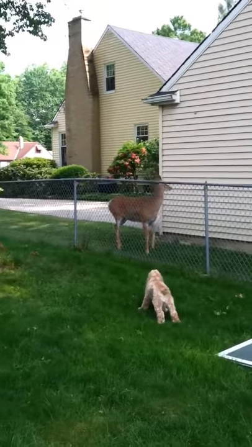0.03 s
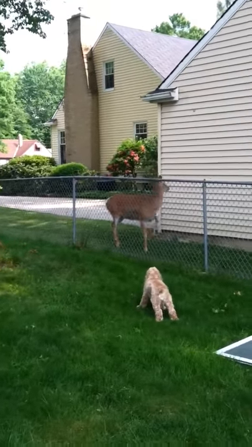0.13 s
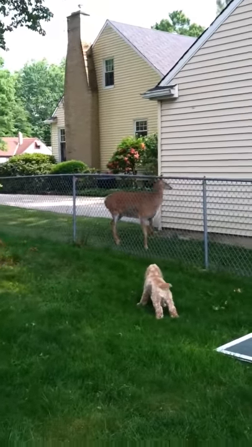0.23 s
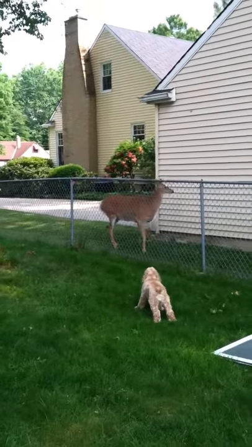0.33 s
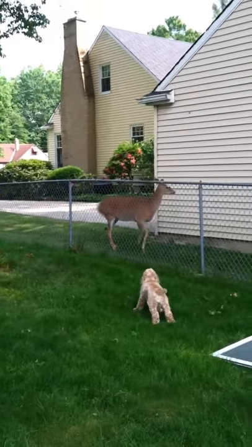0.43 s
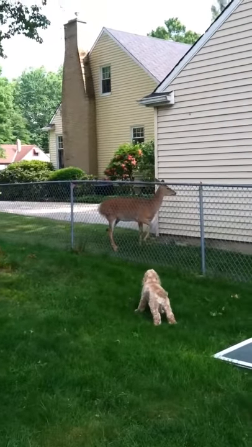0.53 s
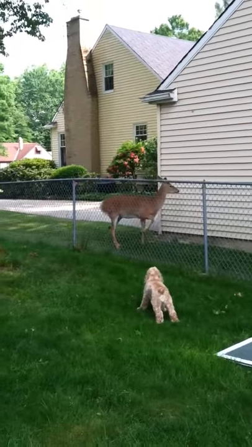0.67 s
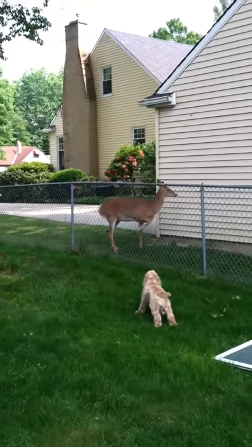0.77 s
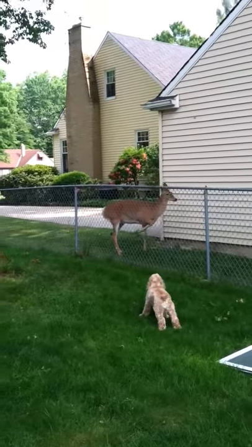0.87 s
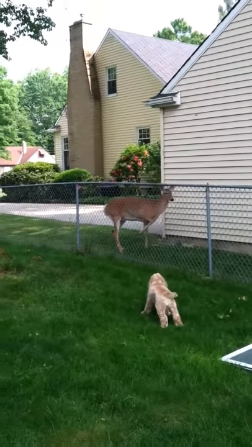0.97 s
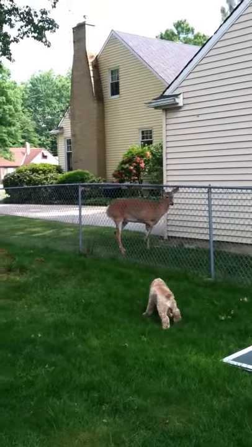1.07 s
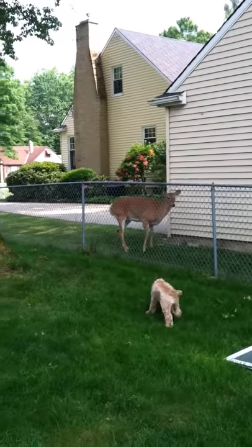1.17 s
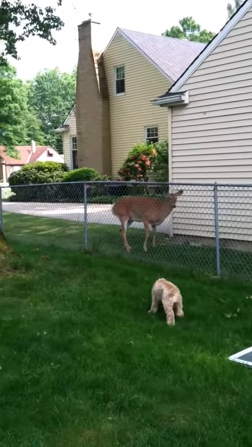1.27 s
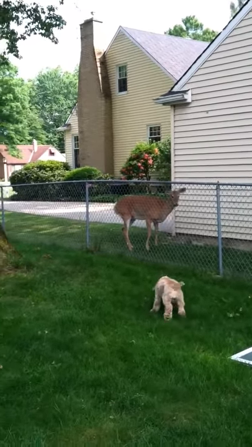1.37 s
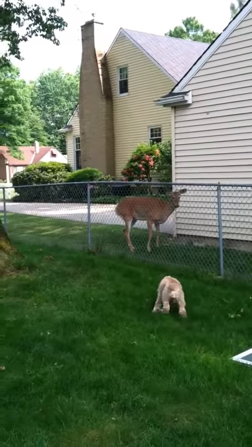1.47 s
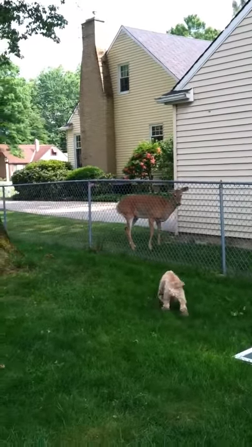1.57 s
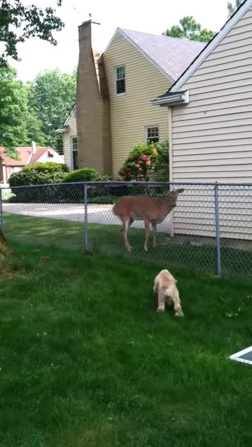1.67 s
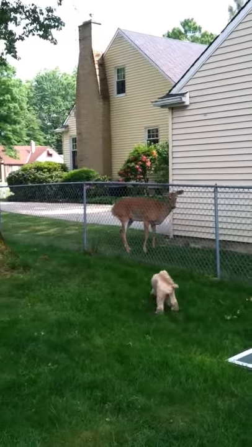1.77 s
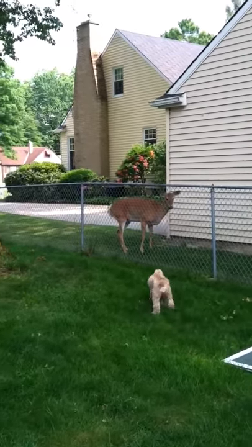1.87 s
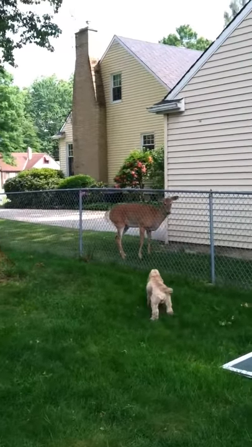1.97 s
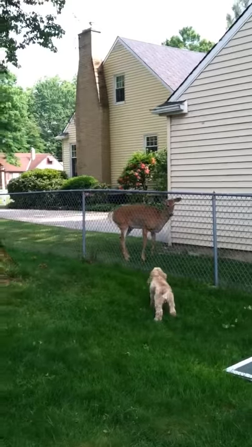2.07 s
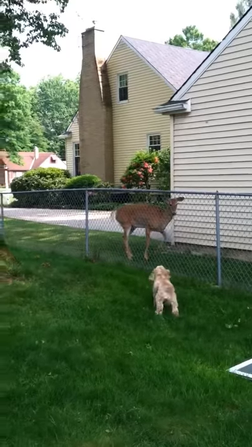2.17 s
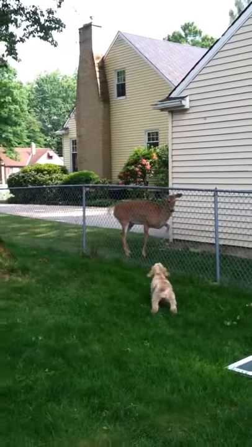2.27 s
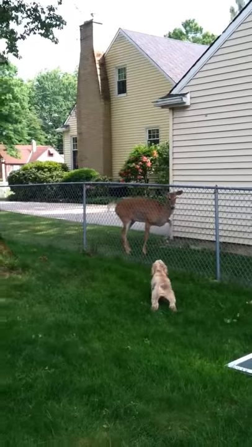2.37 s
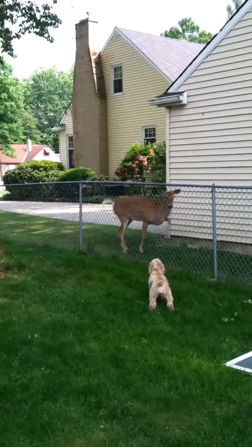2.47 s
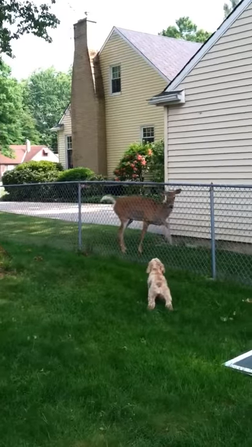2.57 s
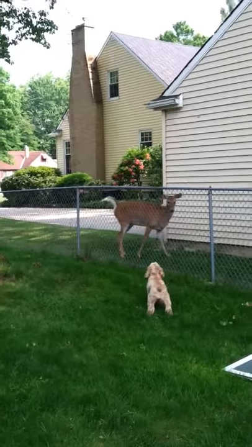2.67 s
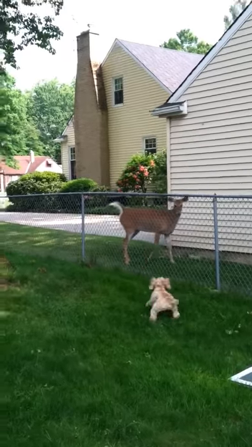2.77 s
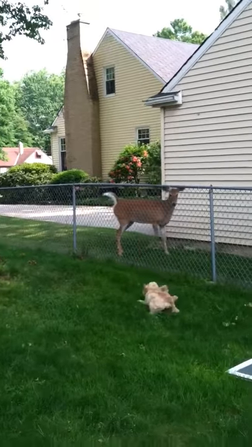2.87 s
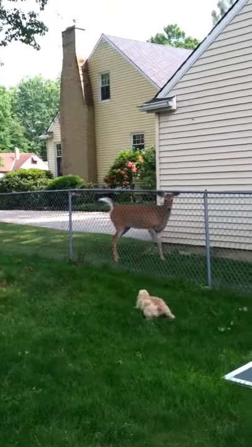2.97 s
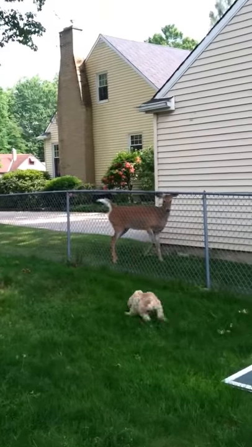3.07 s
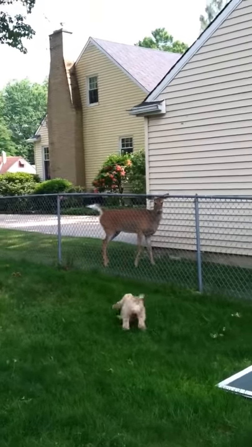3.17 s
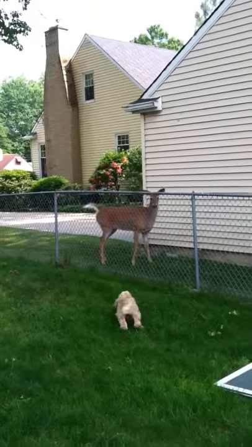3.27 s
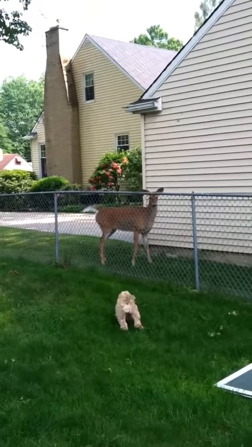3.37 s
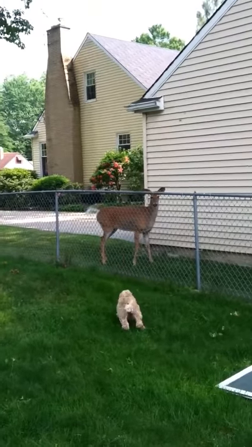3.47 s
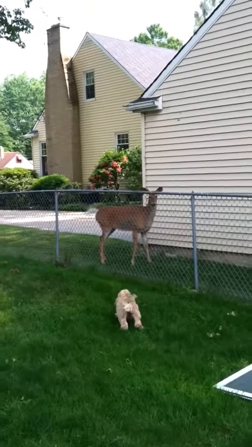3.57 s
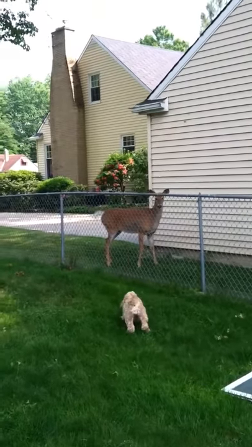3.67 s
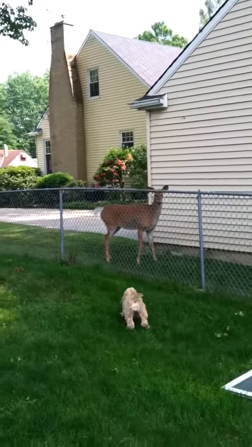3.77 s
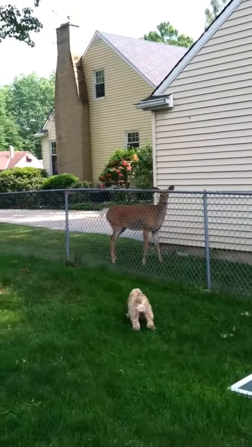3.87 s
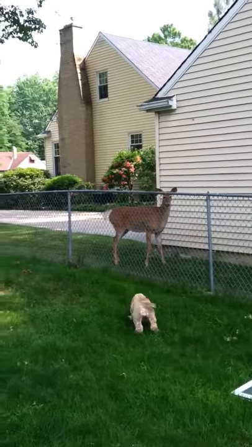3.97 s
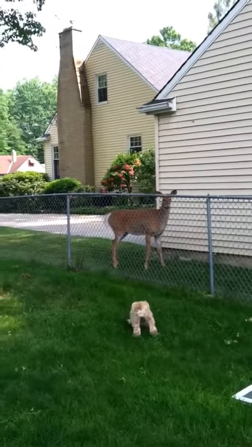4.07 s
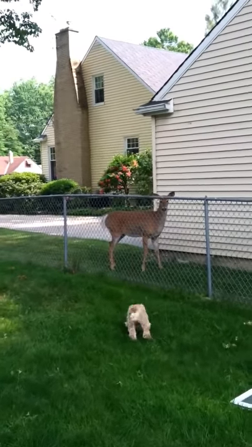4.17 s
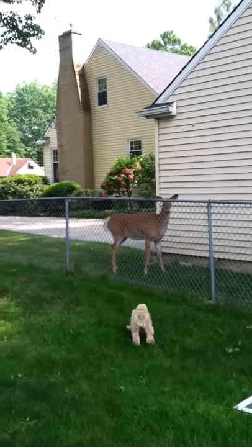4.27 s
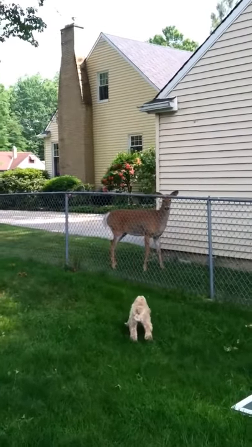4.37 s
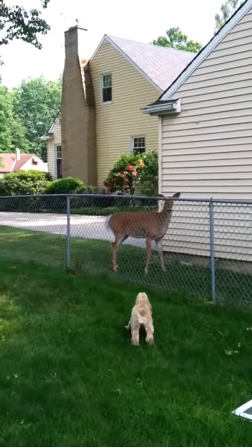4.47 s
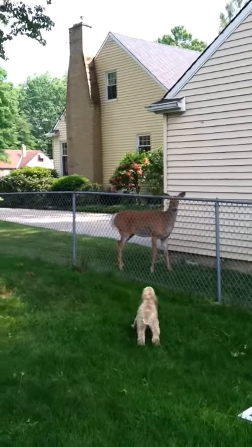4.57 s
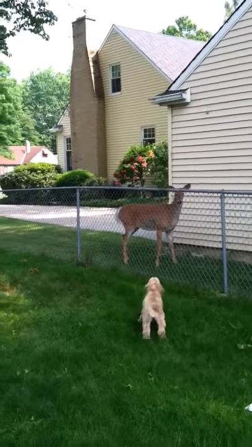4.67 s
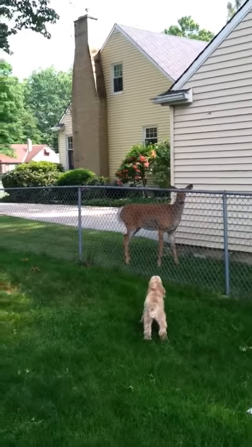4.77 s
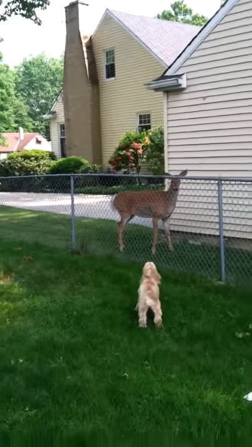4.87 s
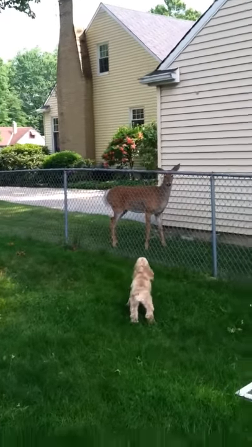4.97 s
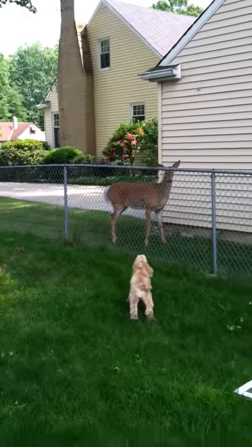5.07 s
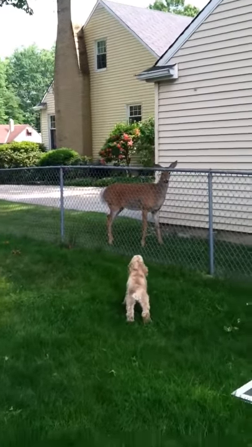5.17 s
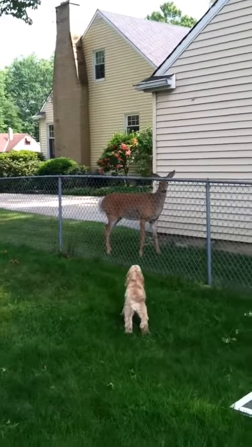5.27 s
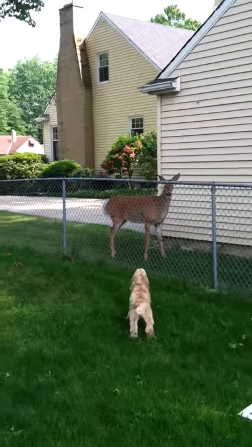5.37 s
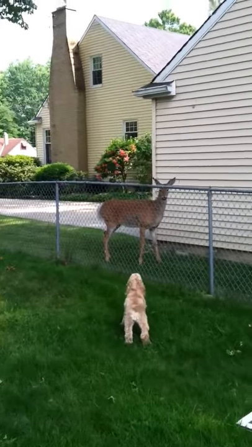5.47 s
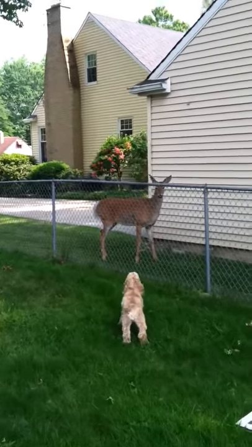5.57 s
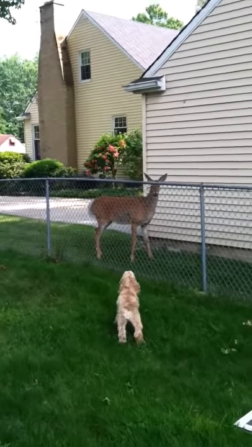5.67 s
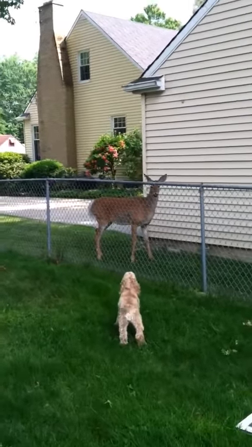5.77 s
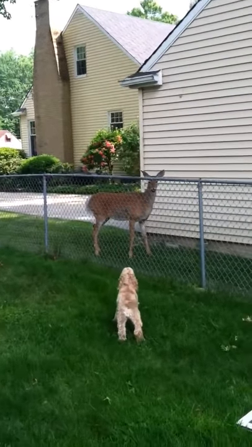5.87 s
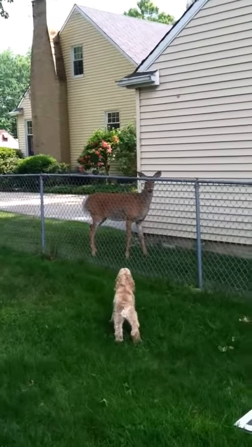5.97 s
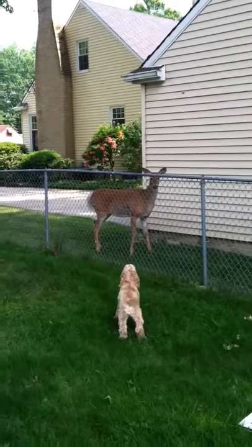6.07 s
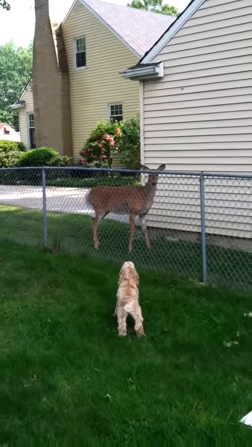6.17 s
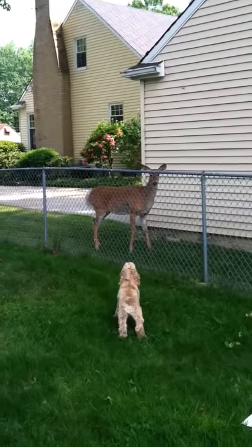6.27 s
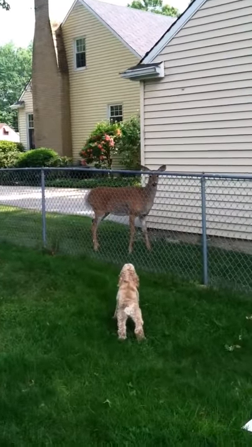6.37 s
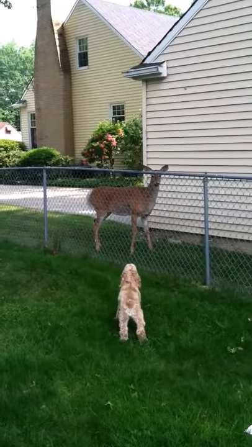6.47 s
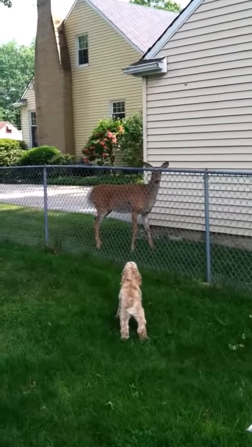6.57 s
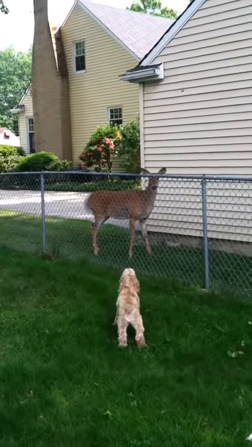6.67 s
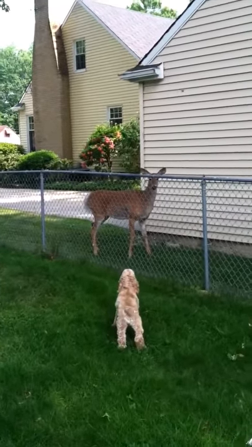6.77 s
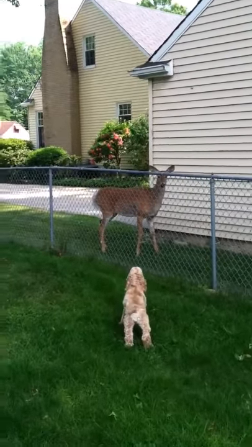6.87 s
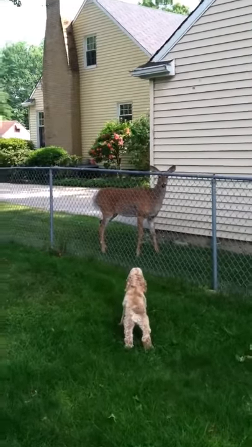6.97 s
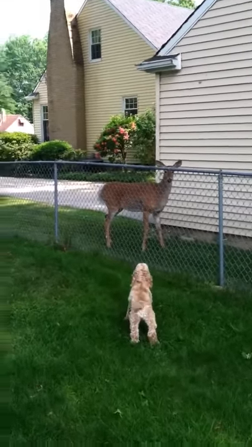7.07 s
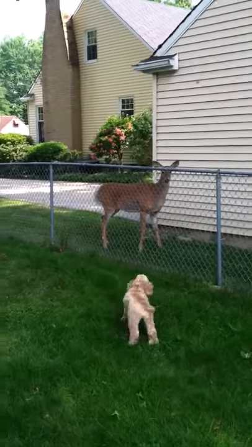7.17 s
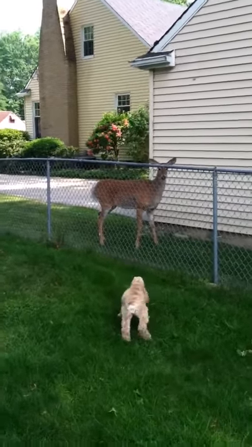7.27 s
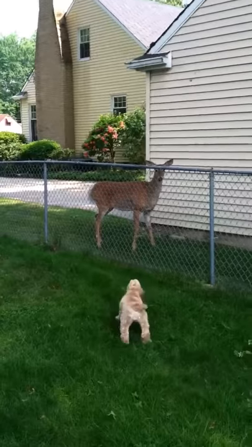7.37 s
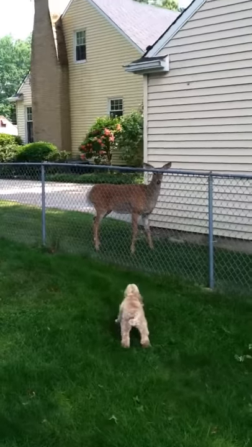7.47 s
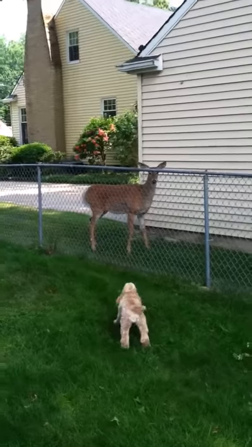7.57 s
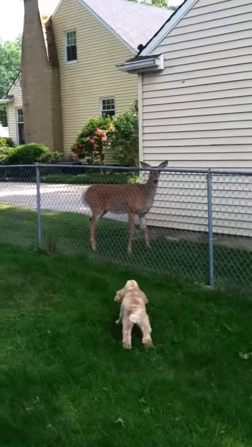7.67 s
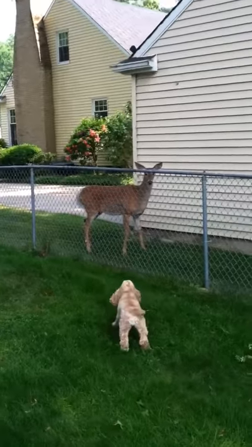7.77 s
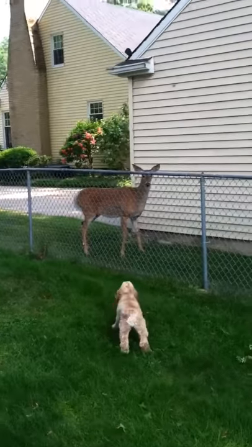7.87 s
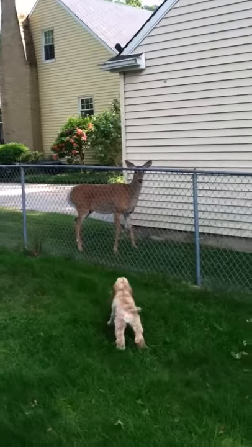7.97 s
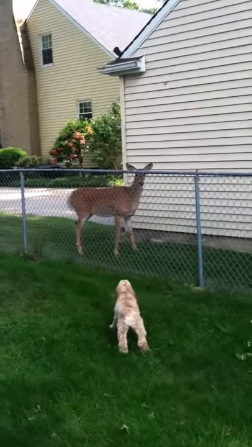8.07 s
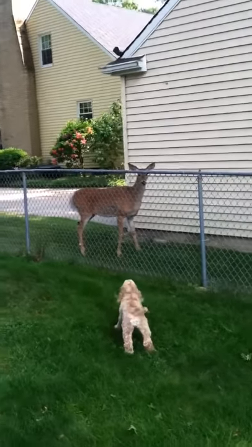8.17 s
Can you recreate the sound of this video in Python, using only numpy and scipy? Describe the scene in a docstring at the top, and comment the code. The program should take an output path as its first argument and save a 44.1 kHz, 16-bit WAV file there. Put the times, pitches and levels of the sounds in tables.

```python
"""A soft outdoor hush lies over a lawn between houses; the grip bumps and ticks on a faintly whining phone.
A small dog barks twice, roughly: its vocal folds drive throat, mouth and muzzle, and each note cracks
into a short yelp that the walls reflect. Four quick barks follow, mostly clean, with grumbles between
them and a thin high chirp. After a pause come a harsh bark, a grumble and a clean bark, amid more small
knocks of the grip. A second chirp ends the scene."""
import sys
import numpy as np
from scipy import signal
from scipy.fft import rfft, irfft, next_fast_len
from scipy.io import wavfile
from scipy.ndimage import uniform_filter1d, map_coordinates

SR = 44100
rng = np.random.default_rng(int(sys.argv[2]) if len(sys.argv) > 2 else 0)


def digitize_waveform(pressure):
    """Quantize a signal to 16-bit integers and store it at the path in sys.argv[1].

    Rows of a 2-D input are taken as channels; values are limited to [-1, 1].
    """
    field = np.atleast_2d(pressure).T
    bounded = np.clip(field, -1, 1)
    quanta = np.round(bounded * 32767).astype(np.int16)
    wavfile.write(sys.argv[1], SR, quanta)


N = 361928


def dog_barks():
    """Register break: each bark scoops up to a held note, jumps about a fifth to a yelp and falls away."""
    # Each row: start in seconds, voice quality, note, yelp, fall.
    # Note: hold in seconds, pitch in Hz, sag in Hz/s, then throat, mouth and muzzle levels in dB.
    # Yelp: length in seconds, pitch in Hz, mouth level in dB, its decay in dB/s, muzzle level in dB.
    # Fall: length in seconds, throat level in dB before its decay.
    barks = [ (1.753, "hoarse", (.055, 634, 411.5, -22, -22, -28), (.010, 1014, -27.5, 108, -29),
             (0.025, -46)), (2.814, "gruff", (.052, 668, 1348, -27, -25.5, -28),
             (.028, 1064, -26.5, 109, -31), (.04, -36.5)),
             (3.949, "husky", (.062, 660.5, 903.5, -21, -28, -33), (.008, 963.5, -28.5, 197.5, -30.5),
             (0.062, -22)), (4.231, "clean", (.030, 680, 543, -19, -32.5, -34),
             (.052, 984.5, -30.5, 9, -32.5), (.075, -28.5)),
             (4.527, "clean", (.038, 660, 45, -24, -32.5, -35), (.042, 983.5, -14, 447, -31.5),
             (0.073, -36)), (4.906, "clean", (.042, 662.5, 159, -22, -29.5, -33.5),
             (.042, 974.5, -16, 453, -30.5), (0.082, -37)),
             (7.102, "harsh", (.060, 636, 726, -20.5, -19, -29), (.014, 979, -25, 201, -27.5),
             (0.054, -29.5)), (7.409, "clean", (.031, 672.5, 255, -21, -25.5, -31),
             (.030, 1011, -16.5, 204, -27.5), (0.09, -32))]
    out = np.zeros(N)
    for start, quality, note, yelp, fall in barks:
        add(out, start, bark(quality, note, yelp, fall))
    return out


def bark(quality, note, yelp, fall, rise_s=0.072):
    """Source and filter: vibrating folds and turbulent air excite the resonances of the vocal tract."""
    # Resonance curves. Each row: frequency in Hz, gain in dB.
    throat_curve = [(120, -42), (230, -13), (340, -16.5), (470, -5.5), (660, 1.5), (785, 5), (900, -42.5),
                    (1300, -80)]
    mouth_curve = [(550, -36), (790, 3.5), (980, 4), (1230, 14.5), (1340, -18.5), (1480, -49), (1900, -72)]
    muzzle_open = [(1100, -63), (1550, 2), (1800, -8), (2020, 6), (2320, 4.5), (2700, -2), (3380, -5),
                   (3720, -21), (4200, -16.5), (4700, -20.5), (5400, -28), (6000, -26.5), (6600, -30.5),
                   (8200, -30.5), (10500, -57.5), (15000, -72)]
    muzzle_closing = [(1100, -42), (1550, -6), (1790, -11), (1970, 4.5), (2300, -6), (2650, -11),
                      (2950, -8), (3300, -4.5), (3750, -38), (4600, -25), (5600, -35.5), (8200, -30.5),
                      (10500, -76), (15000, -75)]
    jitter, shimmer, smear, subharmonic = 0.05, 0.5, 0.45, 0.25  # each scaled by roughness
    noisy_hz, crack_hz_per_s, knee_db = 6500, 45000, -21
    crack_s = rise_s + note[0]
    t = np.arange(int((crack_s + yelp[0] + fall[0]) * SR)) / SR
    pitch, rough, (throat_db, mouth_db, muzzle_db) = vocal_gesture(t, rise_s, quality, note, yelp, fall)
    phase = 2 * np.pi * np.cumsum(pitch * (1 + jitter * rough * wobble(328.2, len(t)))) / SR
    # alternating strong and weak cycles add lines halfway between the harmonics
    order = np.arange(2, 33)[:, None] / 2
    strength = np.where(order % 1, subharmonic * rough, 1)
    # the shape of each cycle varies, which smears the high harmonics into rasp
    blur = smear * rough * order + np.minimum((order * pitch / noisy_hz) ** 2, 2)
    drift = blur * np.array([wobble(280.4, len(t)) for _ in order])
    partials = np.cos(order * phase + drift + rng.uniform(0, 2 * np.pi, order.shape))

    def resonate(curve, rasp, rolloff=0):
        """One resonance filters both the partials and the air puffed out once a cycle."""
        weight = strength * amp(along(curve, order * pitch)) / order ** rolloff
        tone = (weight * partials).sum(0) / np.sqrt(((weight ** 2).sum(0) + amp(knee_db) ** 2) / 2)
        tone *= 1 + shimmer * rough * wobble(259.3, len(t))
        puffs = rng.standard_normal(SR // 2)[:len(t)] * (1 + 1.1 * np.cos(phase))
        air_share = np.clip(rasp * rough, 0, 0.95)
        return np.sqrt(1 - air_share ** 2) * tone + air_share * unit(coloured(puffs, curve))

    # the muzzle rings lower and darker as the jaw closes around the crack
    closing = ramp(t, crack_s - 0.0067, 0.024)
    muzzle = (1 - closing) * resonate(muzzle_open, rasp=1.15, rolloff=0.68)
    muzzle += closing * resonate(muzzle_closing, rasp=1.15, rolloff=0.68)
    throat = resonate(throat_curve, rasp=0.65, rolloff=3.5)
    mouth = resonate(mouth_curve, rasp=0.65)
    voice = amp(throat_db) * throat + amp(mouth_db) * mouth + amp(muzzle_db) * muzzle
    # the folds lose their swing for an instant where the pitch cracks
    glide_hz_per_s = np.gradient(pitch) * SR
    swing = uniform_filter1d(1 / (1 + (glide_hz_per_s / crack_hz_per_s) ** 4), size=90)
    return voice * swing * fade(t, 0.0061)


def vocal_gesture(t, rise_s, quality, note, yelp, fall):
    """Articulation: folds and jaw set pitch, roughness and the levels of throat, mouth and muzzle."""
    # Each entry: hoarseness from 0 to 1 at first and once cleared, time of clearing in seconds.
    qualities = {"clean": (.2, .02, .048), "husky": (.3, .08, .066), "hoarse": (.5, .15, .085),
                 "gruff": (.58, .42, .1), "harsh": (.92, .17, .078)}
    # Each row, throat to muzzle: depth of the swell in dB, its exponent, decay in the hold in dB/s.
    swells = [(23.6, 1.29, 170.5), (15.4, 2.14, 95), (16.4, 1.27, 99.5)]
    # losses of throat, mouth and muzzle: behind the shut jaw, as the folds go slack, through the fall
    shut_db, slack_db, fall_db_per_s = (-2, 20, 25), (0.5, 0.5, 7.5), (124, 450, 248.5)
    scoop, yelp_sag_hz_per_s, rest_hz, yelp_throat_db = 0.6, 687, 411.6, -43
    hoarse, cleared, clears_s = qualities[quality]
    hold_s, note_hz, sag_hz_per_s, *note_db = note
    yelp_s, yelp_hz, yelp_mouth_db, yelp_db_per_s, yelp_muzzle_db = yelp
    _, fall_db = fall
    crack_s = rise_s + hold_s
    # seconds spent in each stage
    held = np.clip(t - rise_s, 0, hold_s)
    yelped = np.clip(t - crack_s, 0, yelp_s)
    falling = np.maximum(t - crack_s - yelp_s, 0)
    # states of the voice, each from 0 to 1
    low = 1 - ramp(t, 0, rise_s)
    shut = 1 - ramp(t, 0, 0.033)
    cracked = ramp(t, crack_s, 0.00432)
    dropped = 1 - np.exp(-falling / 0.019)
    slack = ramp(falling, 0, 0.0043)

    pitch = note_hz * (1 - scoop * low ** 2.1) - sag_hz_per_s * held
    pitch = blend(pitch, yelp_hz - yelp_sag_hz_per_s * yelped, cracked)
    pitch = blend(pitch, rest_hz, dropped)

    yelp_db = (blend(yelp_throat_db, fall_db, dropped),
               yelp_mouth_db - yelp_db_per_s * yelped,
               yelp_muzzle_db)
    levels = []
    for k, (depth_db, exponent, db_per_s) in enumerate(swells):
        db = note_db[k] - depth_db * low ** exponent - shut_db[k] * shut - db_per_s * held
        levels.append(blend(db, yelp_db[k], cracked) - slack_db[k] * slack - fall_db_per_s[k] * falling)

    # roughness is raised at the onset, at the crack and in the fall
    rough = blend(0.045 + 0.45 * low ** 2, 0.12 + 0.4 * np.exp(-yelped / 0.013), cracked)
    rough += (1 - shut) * blend(hoarse, cleared, ramp(t, clears_s, 0.0071))
    return pitch, np.clip(blend(rough, 0.42, slack), 0, 1), levels


def dog_grumbles(jitter=0.028):
    """Closed-mouth voicing: only an unsteady low fundamental and its octave come through."""
    # Each row: start and end in seconds, pitch in Hz, level in dB, relative level of the octave in dB.
    grumbles = [(4.16, 4.237, 238, -47, 9), (4.468, 4.54, 238.8, -44, 5), (4.722, 4.85, 221.3, -48.5, 5.5),
                (7.299, 7.417, 216.8, -43, -10)]
    out = np.zeros(N)
    for start, end, hz, db, octave_db in grumbles:
        t = np.arange(int((end - start) * SR)) / SR
        phase = 2 * np.pi * np.cumsum(hz * (1 + jitter * wobble(99, len(t)))) / SR
        tone = np.sin(phase) + amp(octave_db) * np.sin(2 * phase)
        add(out, start, amp(db) * tone * fade(t, 0.0094))
    return out


def yard_echoes(x, tail_db, build_s=0.0029):
    """Reflection and scattering: walls return distinct echoes, houses and trees a diffuse tail."""
    # Each row: echo delay in seconds, level in dB.
    walls = [(.011, -12), (.024, -10.5), (.041, -31), (.072, -24.5), (.137, -29.5)]
    # Each row: frequency in Hz, time to decay by 60 dB in seconds.
    decay_times = [(200, 1), (700, 0.6), (1400, 0.61), (2000, 0.74), (2600, 0.56), (3300, 0.91),
                   (10000, 0.14)]
    hz, t, spectrum = signal.stft(rng.standard_normal(SR), SR, nperseg=256)
    envelope = amp(-60 * t / along(decay_times, hz)[:, None]) * (1 - np.exp(-t / build_s))
    tail = signal.istft(spectrum * envelope, SR, nperseg=256)[1]
    response = amp(tail_db) * tail / np.linalg.norm(tail)
    for delay, db in walls:
        add(response, delay, amp(db) * np.array([0.25, 0.5, 0.25]))  # slightly dulled
    return signal.fftconvolve(x, response)[:N]


def grip(low_cut_hz=165):
    """Impulse responses: bumps ring the microphone's bass cut, ticks ring the case, clicks just snap."""
    # Each row: start in seconds, peak in dB, contact time in milliseconds.
    bumps = [(0.141, -34.5, 0.45), (0.175, -39, 0.5), (0.4558, -29.5, 0.38), (.4868, -35.5, 0.39),
             (2.5877, -36, 0.79), (3.065, -36, 0.59), (4.549, -26, 0.33), (4.595, -29, 0.28),
             (4.823, -32, 0.61), (4.8652, -23, 0.22), (4.8767, -24.5, 0.32), (5.16, -31.5, 0.57),
             (5.3671, -30.5, 0.2), (6.021, -35, .5), (6.7381, -24, 0.52), (6.81, -39.5, 0.32),
             (6.845, -36.5, 0.31), (7.485, -30.5, 0.62), (7.619, -24.5, 0.25)]
    # Each row: start in seconds, level in dB, gain of the upper modes in dB.
    ticks = [(0.369, -37, 10.5), (.3953, -27, -4), (0.446, -28.5, -5), (0.548, -31.5, -3), (.6118, -30, -3),
             (1.1205, -29.5, 11), (2.759, -28.5, -5.5), (3.58, -46, 13.5), (5.608, -43, 13),
             (6.773, -42.5, 9.5)]
    # Each row: frequency in Hz, level in dB, time to decay by 60 dB in seconds.
    case_modes = [(985, 0, 0.0098), (2010, -3, 0.004), (3120, 4.5, 0.0021)]
    # Each row: start in seconds, peak in dB.
    clicks = [(0.609, -48), (6.701, -48), (6.8176, -37.5), (6.92, -42), (7.2178, -30), (7.4492, -25),
              (7.607, -43), (7.9381, -38.5)]
    # Each row: frequency in Hz, gain in dB.
    click_spectrum = [(2000, -33.5), (5000, 7), (8000, 4), (12000, 9.5), (15500, 7)]
    out, t = np.zeros(N), np.arange(SR // 25) / SR
    bass_cut = signal.butter(4, low_cut_hz, "high", fs=SR, output="sos")
    for start, db, contact_ms in bumps:
        progress = t * 1000 / contact_ms
        push = signal.sosfilt(bass_cut, progress ** 2 * np.exp(-1.54 * progress))
        add(out, start, amp(db) * push / np.abs(push).max())
    for start, db, bright_db in ticks:
        ring = np.zeros(len(t))
        for k, (hz, mode_db, t60) in enumerate(case_modes):
            envelope = amp(mode_db + bright_db * (k > 0) - 60 * t / t60)
            ring += envelope * np.sin(2 * np.pi * hz * rng.normal(1, 0.014) * t)
        add(out, start, amp(db + 3.5) * ring * (1 - np.exp(-t / 0.00086)))
    for start, db in clicks:
        snap = coloured(rng.standard_normal(len(t)) * amp(-60 * t / 0.0016), click_spectrum)
        add(out, start, amp(db) * snap / np.abs(snap).max())
    return out


def bird_chirps(waver=0.065):
    """Frequency modulation: very high tones waver as they sweep down, as of a small bird."""
    # Each row: start in seconds, first and last frequency in Hz, length in seconds, level in dB.
    sweeps = [(4.423, 12300, 8250, 0.071, -70.5), (8.166, 12500, 7000, 0.023, -65)]
    out = np.zeros(N)
    for start, first_hz, last_hz, length, db in sweeps:
        t = np.arange(int(length * SR)) / SR
        hz = np.linspace(first_hz, last_hz, len(t)) * (1 + waver * wobble(1500, len(t)))
        add(out, start, amp(db) * np.sin(2 * np.pi * np.cumsum(hz) / SR) * fade(t, 0.0087))
    return out


def hush(level_db=-54, patchy_db=1.2):
    """Incoherent sources: leaves and far traffic sum to a soft noise with slowly shifting patches."""
    # Each row: frequency in Hz, relative level in dB.
    hush_spectrum = [(25, -37.5), (50, -28.5), (80, -20), (125, -5), (170, -3), (260, -9), (500, -13.5),
                     (700, -12), (1100, -11.5), (1500, -20.5), (3200, -23.5), (5500, -29), (10000, -43.5),
                     (15500, -49.5)]
    spectrum = signal.stft(rng.standard_normal(N), nperseg=1024)[2]
    patches = uniform_filter1d(rng.standard_normal(spectrum.shape), size=6, axis=0)
    patches = uniform_filter1d(patches, size=10, axis=1)
    noise = signal.istft(spectrum * amp(patchy_db * unit(patches)), nperseg=1024)[1][:N]
    return unit(coloured(noise, hush_spectrum)) * amp(level_db)


def amp(db):
    """Decibels to amplitude gain."""
    return 10 ** (np.asarray(db) / 20)


def unit(x):
    """Normalisation to rms 1."""
    return x / np.sqrt(np.mean(x ** 2) + 1e-20)


def along(points, hz):
    """Interpolation of (Hz, value) points on a logarithmic frequency axis."""
    knots_hz, values = np.transpose(points)
    return np.interp(np.log(np.abs(hz) + 1), np.log(knots_hz + 1), values)


def wobble(rate, size):
    """Smooth random modulation, with rate knots a second."""
    return map_coordinates(rng.standard_normal(size=256), [np.arange(size) * rate / SR], mode="mirror")


def coloured(x, points):
    """Zero-phase filtering by a curve of (Hz, dB) points."""
    size = next_fast_len(len(x) + 4096)
    gain = amp(along(points, np.fft.rfftfreq(size, 1 / SR)))
    return irfft(rfft(x, size) * gain, size)[:len(x)]


def add(track, start_s, sound):
    """Superposition of a sound on the track."""
    part = track[max(round(start_s * SR), 0):][:len(sound)]
    part += sound[:len(part)]


def fade(t, edge_s):
    """Linear taper at both ends."""
    return np.clip(np.minimum(t - t[0], t[-1] - t) / edge_s, 0, 1)


def ramp(t, start_s, length_s):
    """Linear rise from 0 to 1."""
    return np.clip((t - start_s) / length_s, 0, 1)


def blend(a, b, share):
    """Linear interpolation from a to b."""
    return a + (b - a) * share


def scene():
    """Superposition: dog and chirps with their reflections, the hush, and the hand on the phone."""
    dog = dog_barks() + dog_grumbles()
    chirps = bird_chirps()
    echoes = yard_echoes(dog, tail_db=-15) + yard_echoes(chirps, tail_db=9.5)
    return (dog + chirps + echoes + hush() + grip())[None]


def record(dry):
    """Band limiting: the phone adds its faint electronic whine and keeps nothing above top_hz."""
    # Each row: frequency in Hz, rms level in dB.
    whine_tones = [(10761, -95), (14998, -86)]
    top_hz = 15700
    t = np.arange(N) / SR
    whine = sum(amp(db) * np.sqrt(2) * np.sin(2 * np.pi * hz * t) for hz, db in whine_tones)
    size = next_fast_len(N + SR // 2)
    passband = np.fft.rfftfreq(size, 1 / SR) < top_hz
    return irfft(rfft(dry + whine, size) * passband, size)[..., :N]


dry = scene()
out = record(dry)
digitize_waveform(out)
```